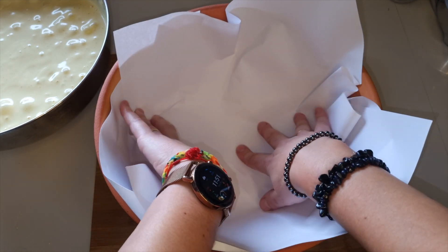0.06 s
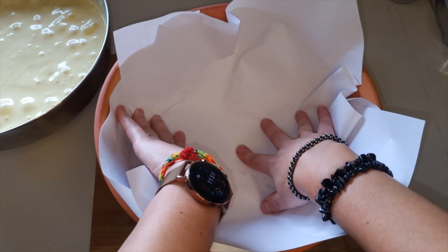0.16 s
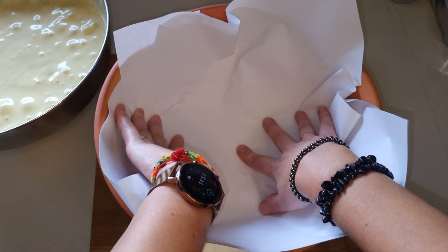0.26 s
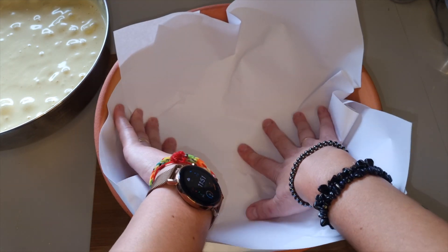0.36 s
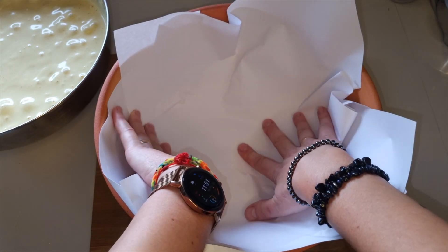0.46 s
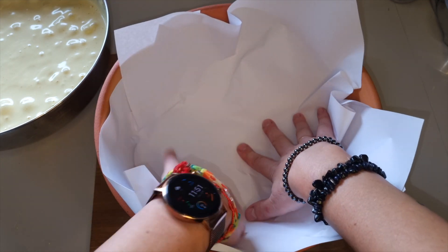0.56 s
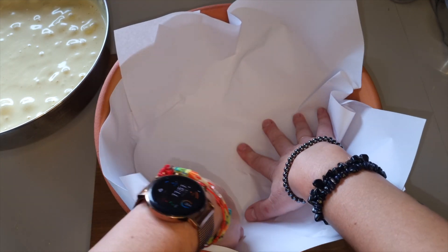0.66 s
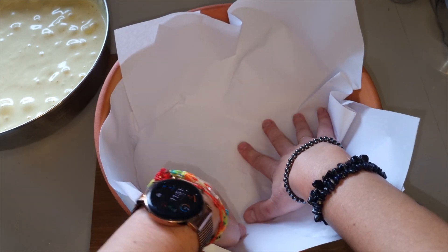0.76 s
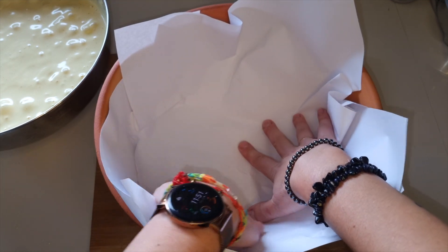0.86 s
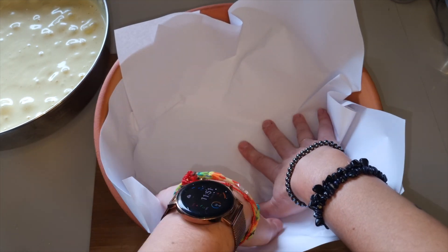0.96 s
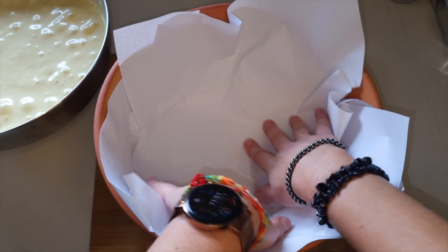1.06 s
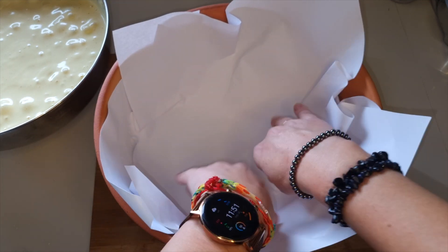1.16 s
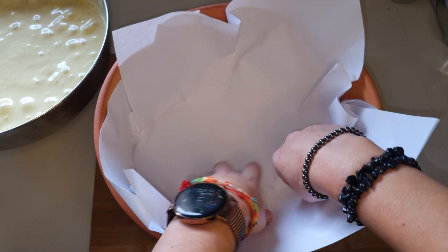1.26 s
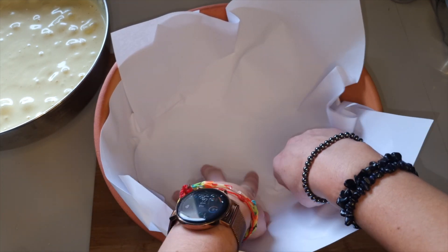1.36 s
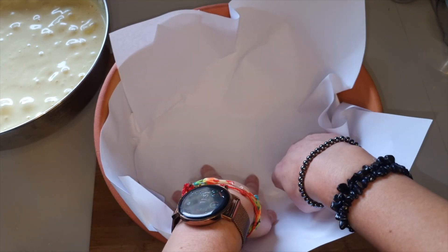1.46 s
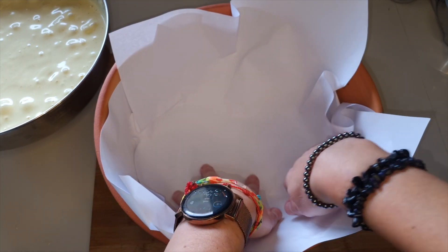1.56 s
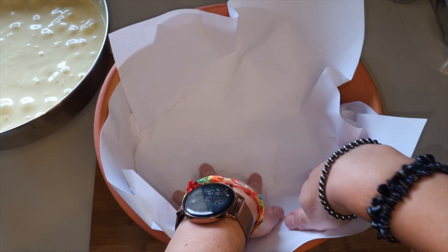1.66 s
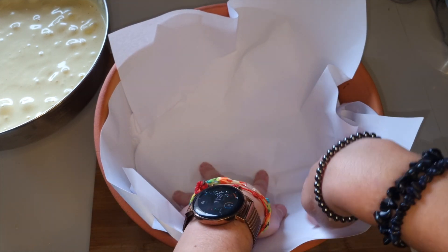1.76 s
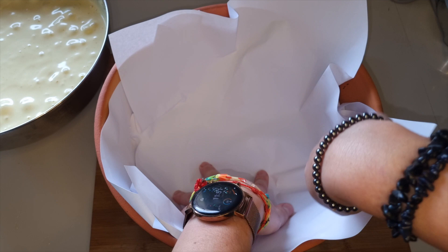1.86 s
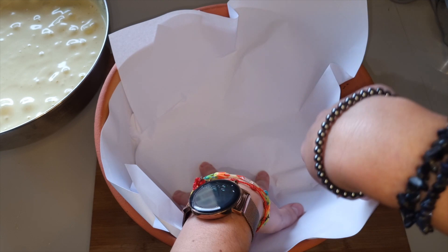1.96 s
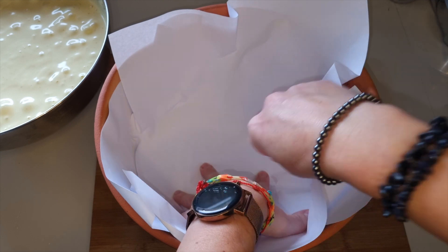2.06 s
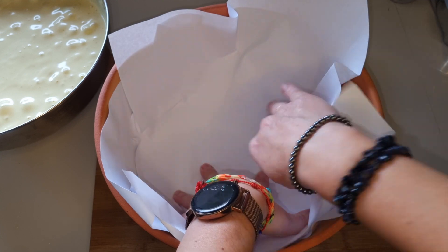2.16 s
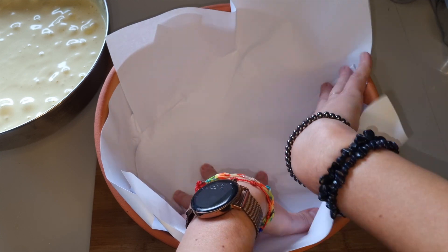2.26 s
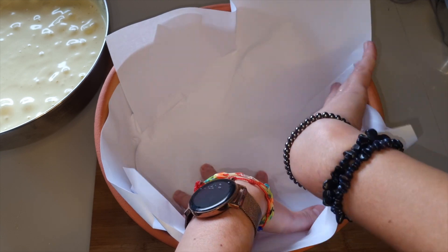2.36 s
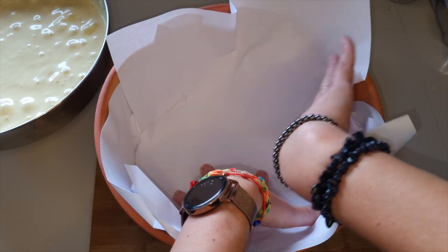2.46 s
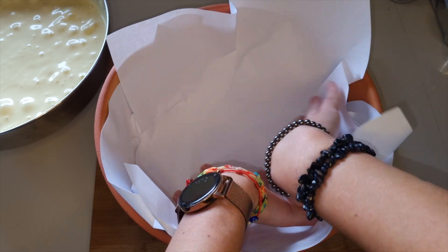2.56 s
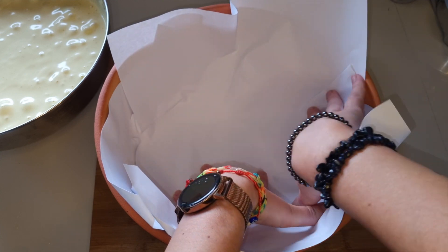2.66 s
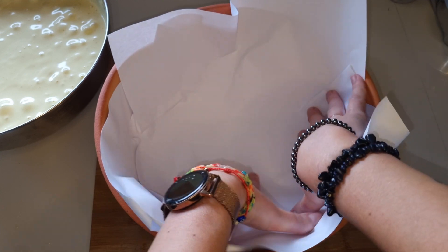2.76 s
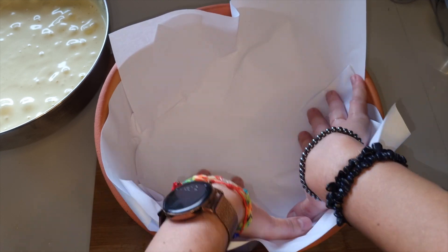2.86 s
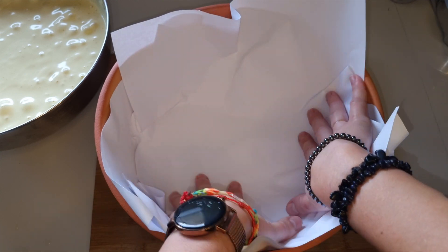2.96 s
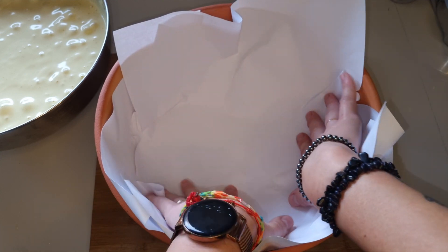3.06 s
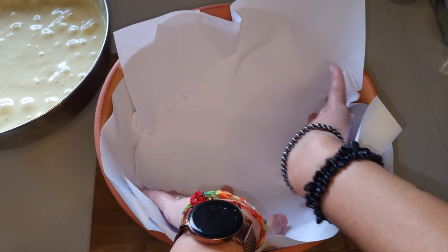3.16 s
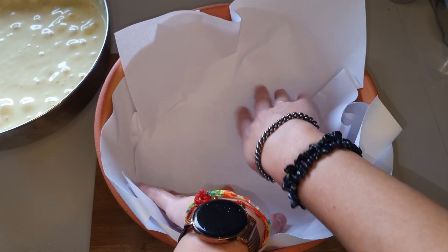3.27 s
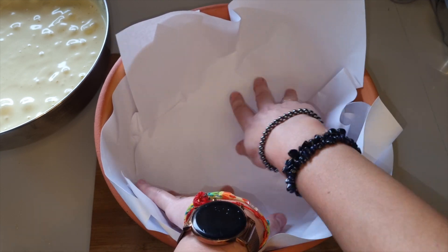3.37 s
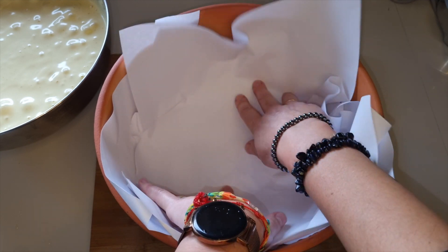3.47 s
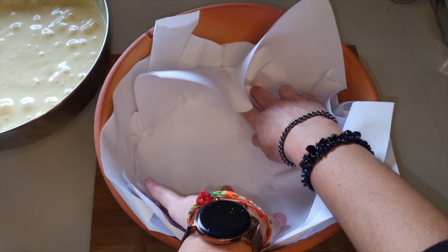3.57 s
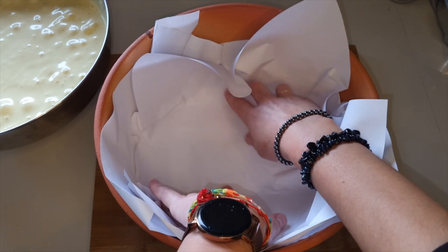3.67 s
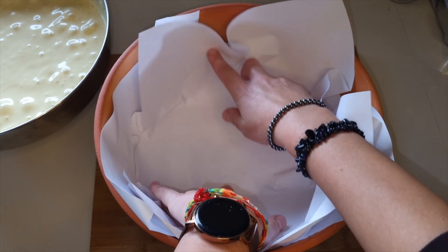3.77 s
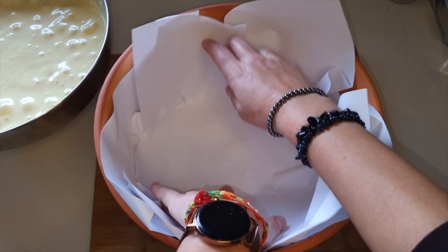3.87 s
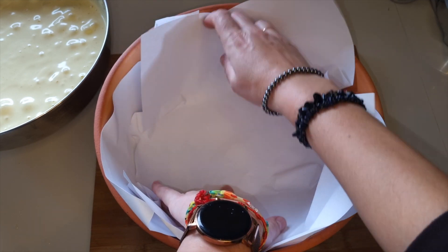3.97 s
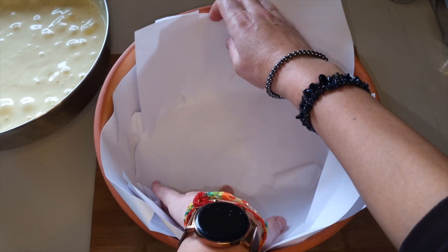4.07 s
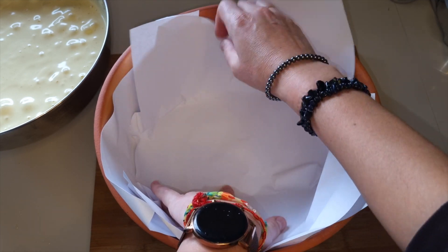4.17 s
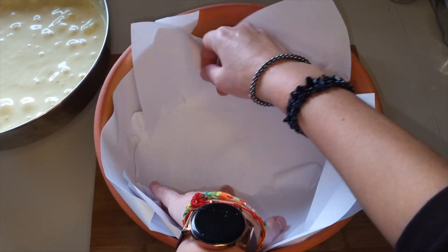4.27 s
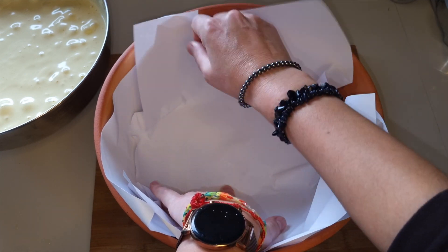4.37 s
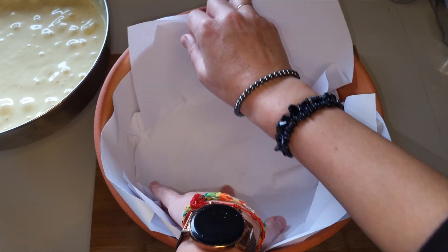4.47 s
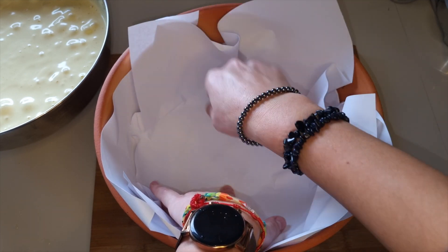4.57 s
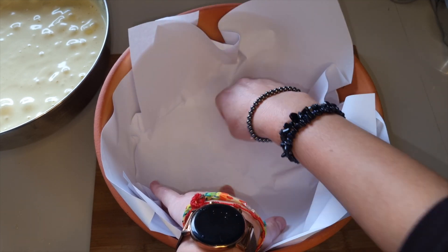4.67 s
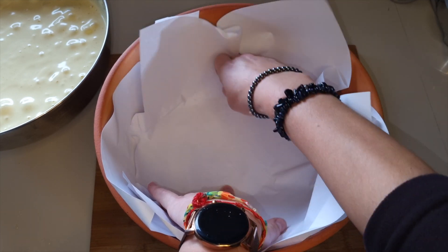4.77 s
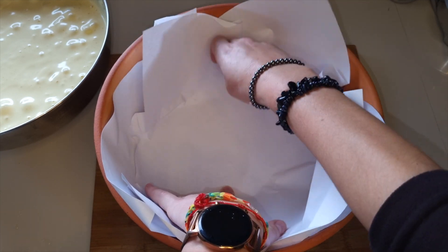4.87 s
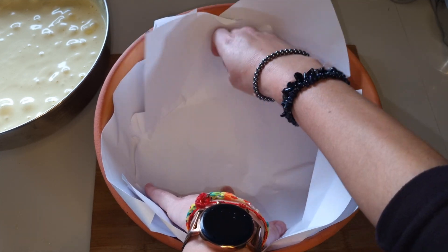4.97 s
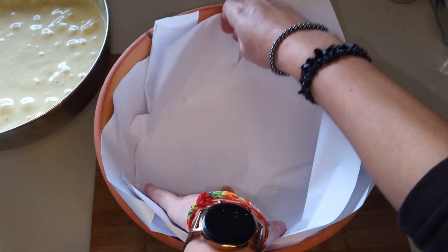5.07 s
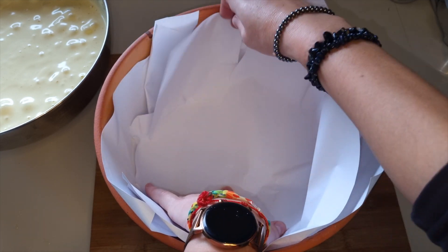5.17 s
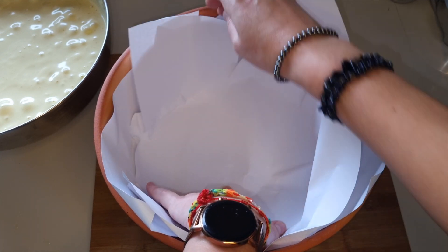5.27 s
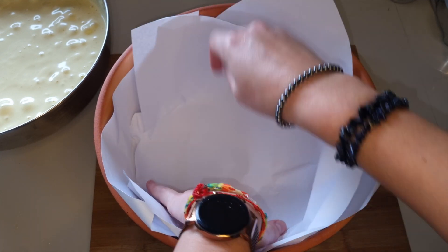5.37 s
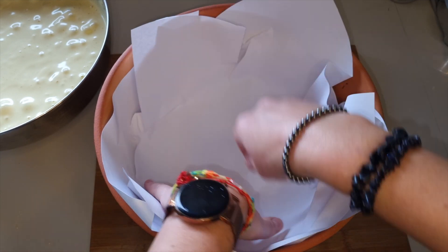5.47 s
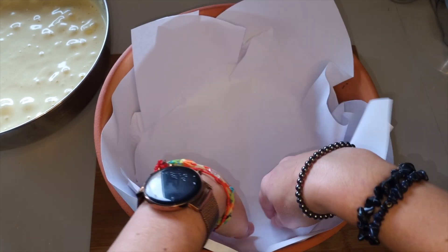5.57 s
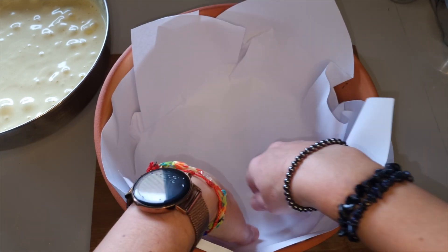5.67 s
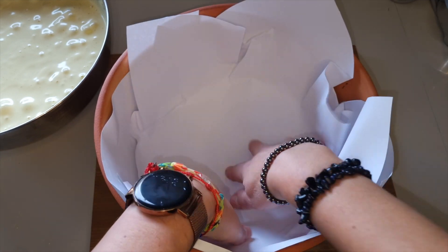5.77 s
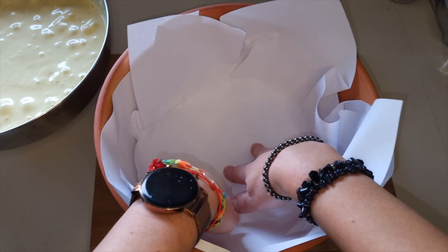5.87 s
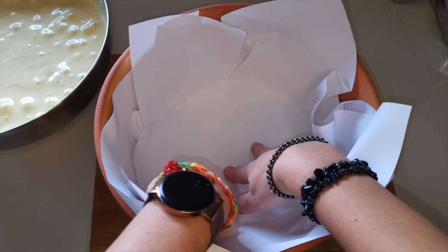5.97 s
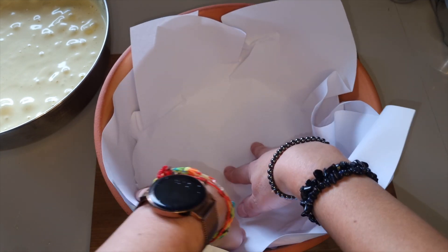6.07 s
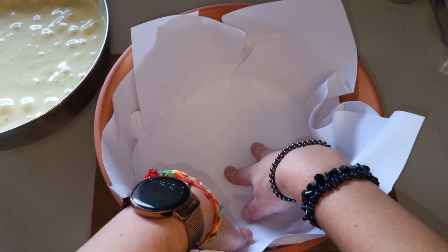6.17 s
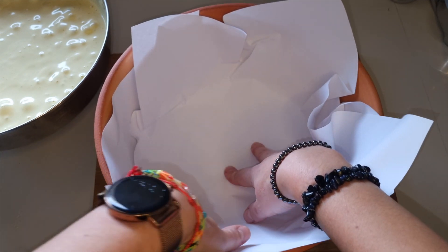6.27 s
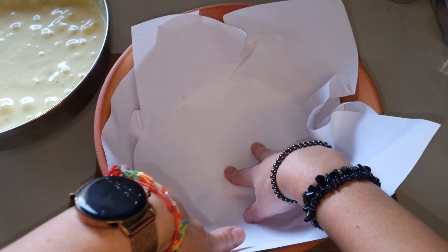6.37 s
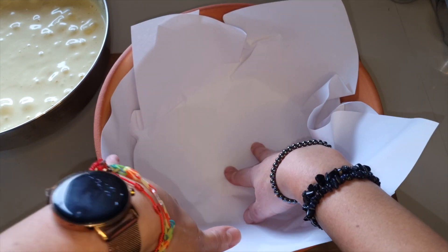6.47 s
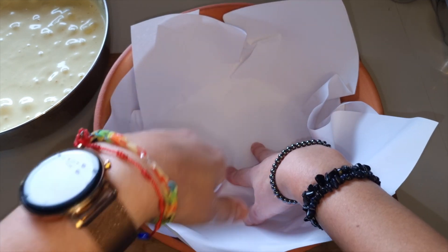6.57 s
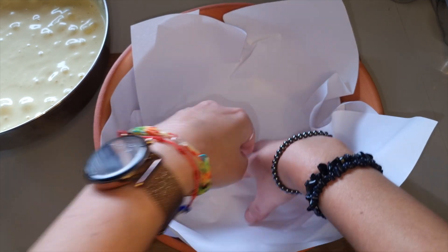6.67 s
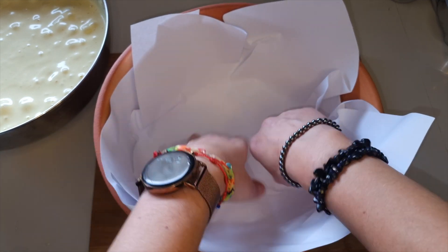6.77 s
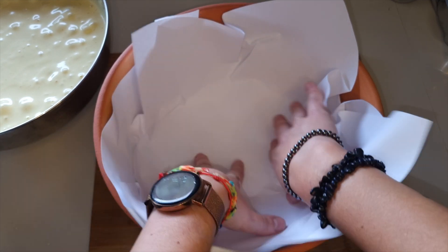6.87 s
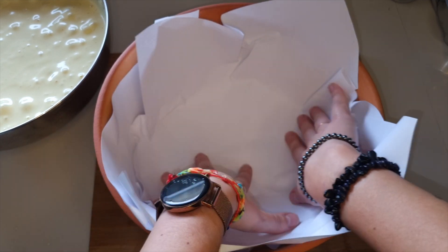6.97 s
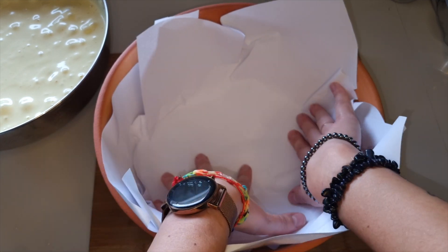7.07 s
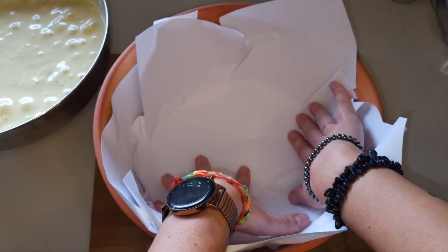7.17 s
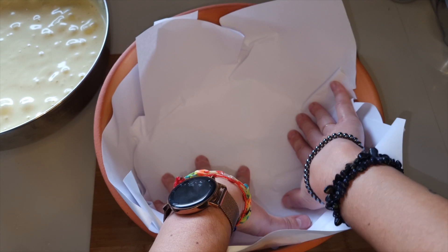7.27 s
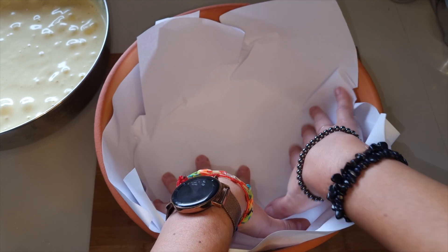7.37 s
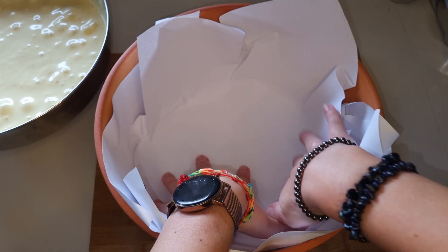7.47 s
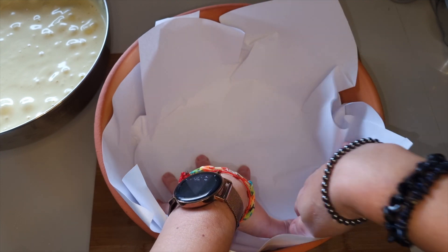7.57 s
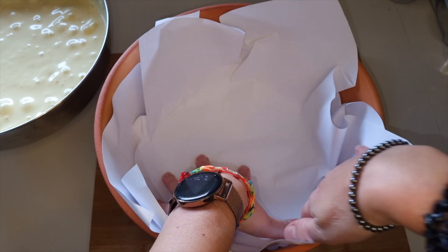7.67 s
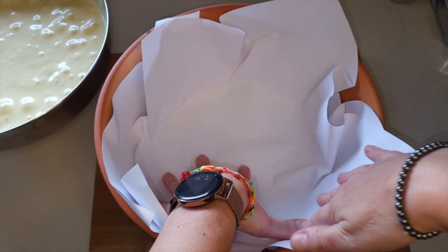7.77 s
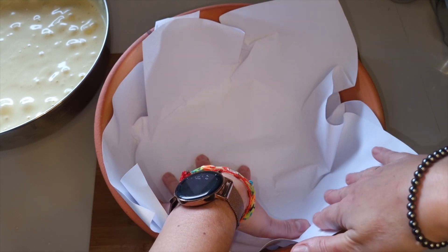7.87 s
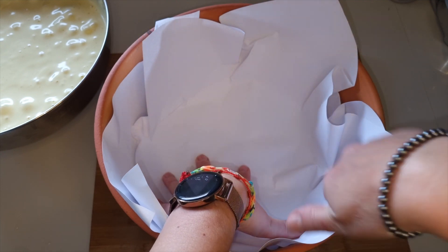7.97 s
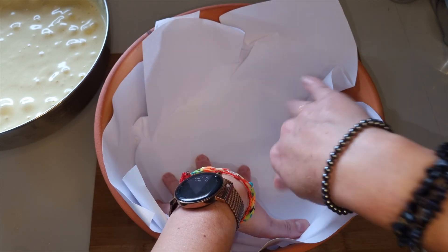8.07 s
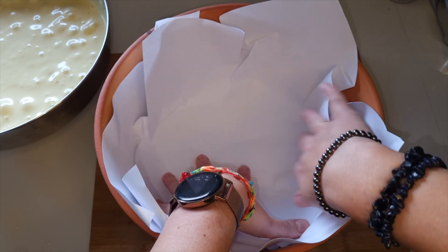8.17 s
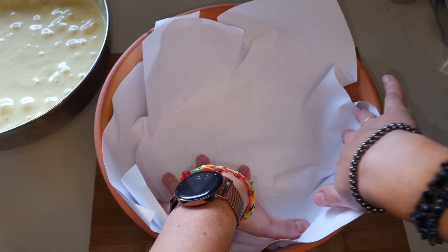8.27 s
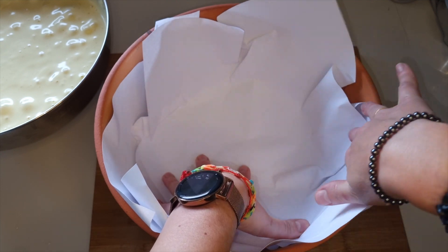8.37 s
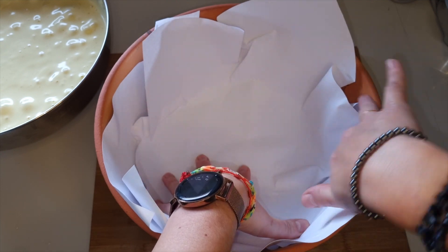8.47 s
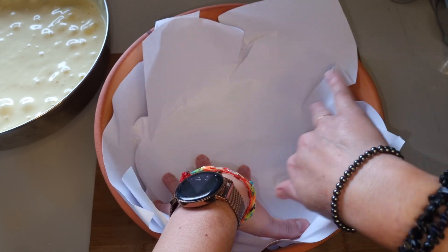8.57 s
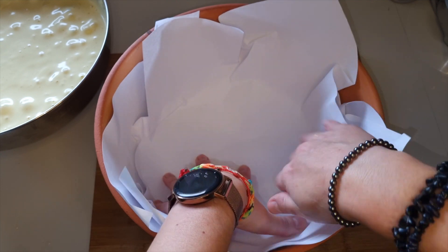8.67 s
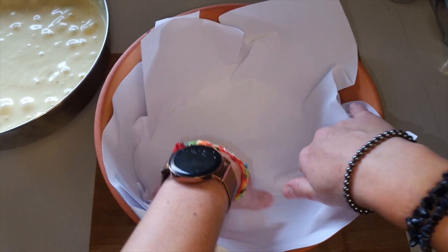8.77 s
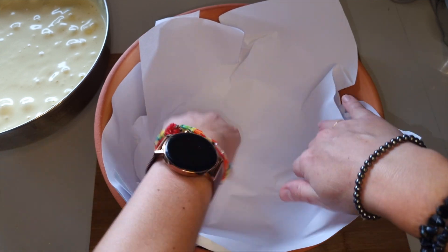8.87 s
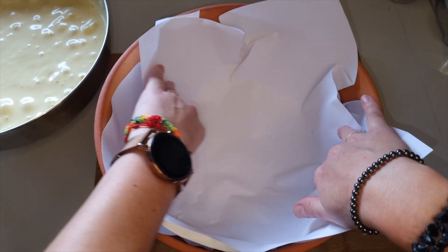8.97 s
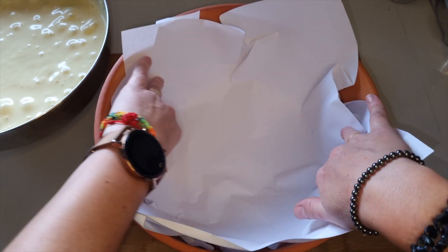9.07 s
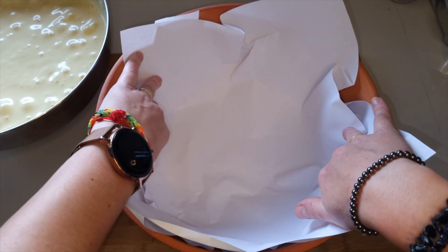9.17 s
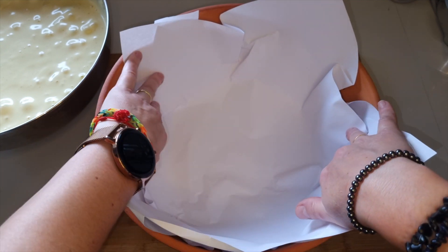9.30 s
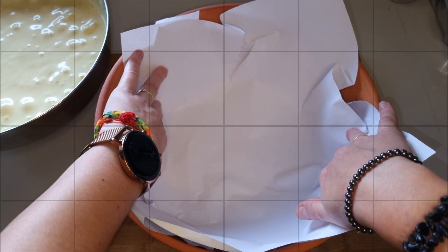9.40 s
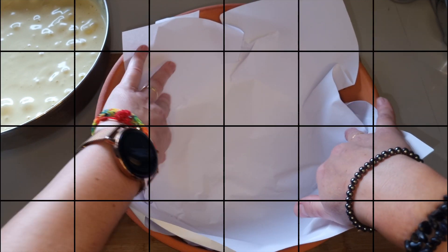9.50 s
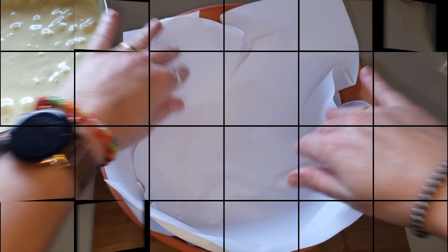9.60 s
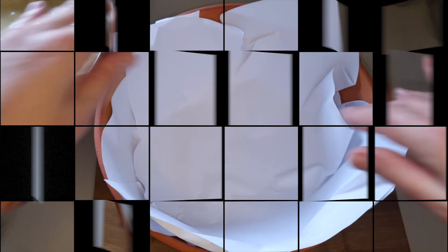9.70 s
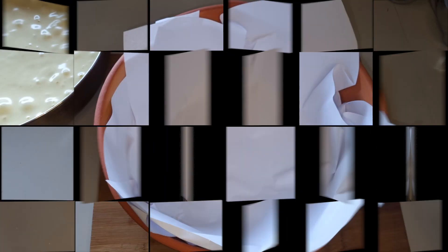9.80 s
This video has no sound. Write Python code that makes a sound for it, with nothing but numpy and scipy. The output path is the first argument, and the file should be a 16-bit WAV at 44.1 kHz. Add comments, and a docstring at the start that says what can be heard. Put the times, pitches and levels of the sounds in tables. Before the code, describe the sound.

Close stereo sound of baking paper being pressed into a round clay pan in a small kitchen. Crackling strokes and papery hiss come in uneven bursts, with sharp crease snaps, the hardest early on, then dense runs of crinkling. Soft palm thuds and a hollow pan murmur lie beneath. The handling becomes sparser near the end, over a very faint low appliance hum.

```python
"""Hands press and fold baking paper into a round clay pan on a counter, close to a stereo microphone, 9.8 s.
From the start: steady low appliance noise, then paper strokes (clumped crackles over sliding hiss) and room echoes.
From 0.07 s creases snap as shaped noise bursts with a panel note; from 0.12 s palms thud as damped pan modes.
The hardest snap falls at 1.4 s, dense runs follow to about 5 s, and snaps thin out after 7.5 s.
Paper and palms also excite the pan's hollow resonances."""
import sys
import numpy as np
from scipy import signal
from scipy.fft import rfft, irfft
from scipy.io import wavfile
from scipy.ndimage import uniform_filter1d

SR = 44100
rng = np.random.default_rng(int(sys.argv[2]) if len(sys.argv) > 2 else 0)


def generate_wav(signal):
    """Clip the signal to [-1, 1] and save it as 16-bit WAV at the path in sys.argv[1]."""
    frames = np.transpose(np.atleast_2d(signal))
    scaled = np.clip(frames, -1, 1) * 32767
    pcm = np.round(scaled).astype(np.int16)
    wavfile.write(sys.argv[1], SR, pcm)


N = 433944


def gain_of(db):
    """Decibels to amplitude."""
    return 10 ** (np.asarray(db) / 20)


def evened(x):
    """Scales to an rms of one."""
    return x / np.sqrt(np.mean(x ** 2) + 1e-20)


def read(points, hz):
    """Interpolates a table along log frequency."""
    f, value = np.transpose(points)
    return np.interp(np.log(hz + 1), np.log(f + 1), value)


# left-right correlation: f/Hz, correlation
LIKENESS = [(100, 0.97), (700, 0.78), (1500, 0.48), (3000, 0.15), (12000, 0.06)]


def pair(a, b):
    """Stereo spectra from two independent sources: channels alike in the bass, loose in the treble."""
    hz = np.fft.rfftfreq(a.shape[-1], 1 / SR)
    same = np.clip(read(LIKENESS, hz), 0, 1)
    mid = rfft(a) * np.sqrt(1 + same)
    side = rfft(b) * np.sqrt(1 - same)
    return hz, np.array([mid + side, mid - side]) / 2 ** .5


# pan resonances, hollow and walls: f/Hz, width/Hz, level/dB
PAN_MODES = [(187.4, 22, 1), (360.3, 54, 0.5), (434.3, 39, 6)]


def hollow(hz):
    """Summed band-pass response of the pan's resonances."""
    return sum(gain_of(db) * 1j * w * hz / (f * f - hz * hz + 1j * w * hz) for f, w, db in PAN_MODES)


# appliance noise spectrum: f/Hz, level/dB
HUM_SPECTRUM = [(30, -27), (55, -20.5), (86, -5.5), (130, -32.5), (172, 0.5), (215, -7.5), (460, -13),
                (640, -24), (3000, -41.5), (16000, -65)]
HUM_RMS_DB = -58.5


def hum():
    """Steady appliance noise of the kitchen, weighted to the low end."""
    hz, z = pair(*rng.standard_normal((2, N)))
    noise = irfft(z * gain_of(read(HUM_SPECTRUM, hz)), N)
    return gain_of(HUM_RMS_DB) * evened(noise)


# hands pushing or dragging paper, levels relative:
# full grip t/s, swell/ms, length/s, rustle level/dB, treble level/dB, pan pressure level/dB
STROKES_TABLE = [(0.0, 25, 0.24, -39.5, -45, -45), (0.146, 340, 0.16, -35.5, -35, -39),
                 (0.426, 270, 0.26, -38, -42, -43), (0.683, 63, 0.13, -40, -43, -43),
                 (0.824, 120, 0.087, -37, -43, -35), (1.067, 260, 0.048, -35.5, -40.5, -43.5),
                 (1.246, 35, 0.18, -27, -35.5, -33), (1.63, 510, 0.1, -39.5, -39, -44.5),
                 (1.796, 110, 0.24, -43.5, -42, -40.5), (1.993, 140, 0.38, -41, -43.5, -46),
                 (2.233, 180, 0.048, -34.5, -37.5, -28.5), (2.33, 21, 0.1, -43, -39.5, -33),
                 (2.59, 113, 0.051, -38, -39, -35), (2.752, 54, 0.095, -31.5, -36, -34.5),
                 (2.898, 19, 0.29, -31, -35.5, -30.5), (3.257, 17, 0.06, -55, -62, -45),
                 (3.378, 63, 0.23, -29, -33, -36), (3.678, 31, 0.086, -35.5, -43.5, -46),
                 (3.84, 91, 0.09, -43, -38.5, -38), (3.91, 42, 0.18, -37.5, -43.5, -45),
                 (4.146, 31, 0.023, -40, -41, -45), (4.329, 240, 0.082, -37, -42.5, -41.5),
                 (4.635, 20, 0.1, -32, -36, -44.5), (4.809, 164, 0.05, -34, -35.5, -47),
                 (4.923, 52, 0.17, -34, -34.5, -50), (5.208, 140, 0.026, -40, -46.5, -44.5),
                 (5.358, 87, 0.026, -42, -48.5, -39.5), (5.556, 340, 0.23, -41.5, -44.5, -42.5),
                 (5.767, 13, 0.34, -42, -51, -40.5), (5.992, 260, 0.21, -38.5, -43.5, -43),
                 (6.251, 150, 0.44, -42, -43.5, -39.5), (6.64, 69, 0.15, -38.5, -42, -45.5),
                 (6.84, 51, 0.13, -32, -39, -35.5), (7.031, 100, 0.046, -37, -47, -41.5),
                 (7.142, 33, 0.022, -46, -53, -40), (7.249, 10, 0.13, -36.5, -39.5, -38),
                 (7.519, 87, 0.22, -44, -44.5, -41), (7.747, 590, 0.26, -43.5, -41, -45.5),
                 (8.163, 11, 0.18, -37, -41, -43.5), (8.49, 190, 0.032, -47.5, -49, -47.5),
                 (8.632, 79, 0.18, -44.5, -49.5, -42), (8.942, 82, 0.32, -40.5, -49.5, -45.5),
                 (9.108, 24, 0.046, -34, -45, -36), (9.308, 58, 0.25, -59.5, -60.5, -60),
                 (9.515, 180, 0.033, -49, -49.5, -55)]
# slackening along a stroke: rustle, treble, pressure [dB/s]
SLACKEN_DB_PER_S = [41, 37.5, 37]
SWELL_DB, RELEASE_DB_PER_S = 27.5, 185  # rise over the swell time; extra fall once let go


def effort():
    """Rustle, treble and pressure in dB: strokes swell, slacken, let go; overlaps add in power."""
    t = np.arange(0, N, 64) / SR
    s, swell_ms, length_s, *levels_db = np.transpose(STROKES_TABLE)[:, :, None]
    since = np.maximum(t - s, 0)
    swell_db = SWELL_DB * np.maximum(s - t, 0) * 1000 / swell_ms
    release_db = RELEASE_DB_PER_S * np.maximum(since - length_s, 0)
    edge_db = swell_db + release_db
    power = [(gain_of(db - edge_db - sag * since) ** 2).sum(0)
             for db, sag in zip(levels_db, SLACKEN_DB_PER_S)]
    return [np.interp(np.arange(N) / SR, t, 10 * np.log10(p + 1e-14)) for p in power]


def crackles(count=16, size=512):
    """Small creases give way in bursts of a few ms, each patch of paper with its own broad colour."""
    fires = rng.random(N) < 850 / SR  # 850 per s on average
    strength = gain_of(3.57 * np.minimum(rng.exponential(1, N), 3.2)) * fires
    patch = rng.integers(0, count, N)
    lean = rng.standard_normal((2, N))
    t, hz = np.arange(size) / SR, np.fft.rfftfreq(size, 1 / SR)
    out = np.zeros((2, N))
    for k, ring_hz in enumerate(np.geomspace(780, 3000, count)):
        colour = 0.26 + 1 / (1 + ((hz - ring_hz) / (0.19 * ring_hz)) ** 2)
        burst = t * np.exp(-t / 0.0019 * np.sqrt(ring_hz / 1200))
        pop = irfft(rfft(rng.standard_normal(size)) * colour) * burst
        out += signal.oaconvolve(strength * (patch == k) * lean, evened(pop)[None])[:, :N]
    return evened(out)


# paper body spectrum, also in snaps: f/Hz, level/dB
PAPER_BODY = [(400, -4.5), (700, -14), (850, 2.5), (1200, -1.5), (2400, -4.5), (3300, -1), (4300, -10),
              (8000, -32.5)]
# paper treble spectrum, also in snaps: f/Hz, level/dB
PAPER_FIZZ = [(2500, -16.5), (5000, 4), (9000, 4), (14000, 0), (16000, -3)]


def rustle():
    """Crackles clump over the smooth hiss of sliding paper and the murmur of the pan."""
    body_db, treble_db, press_db = effort()
    drift = uniform_filter1d(rng.standard_normal((3, N)), 600)
    clumps = evened(uniform_filter1d(drift, 600))
    hz, slide = pair(*rng.standard_normal((2, N)))
    hz, pops = pair(*(crackles() * gain_of(1.66 * clumps[0])))
    body = evened(irfft((0.53 * slide + 0.5 * pops) * gain_of(read(PAPER_BODY, hz)), N))
    fizz = evened(irfft((slide + 0.26 * pops) * gain_of(read(PAPER_FIZZ, hz)), N))
    boom = evened(irfft((slide + 1.7 * pops) * hollow(hz) * hz / (hz + 300), N))
    body = body * gain_of(body_db - 3.0)
    fizz = fizz * gain_of(treble_db - 2.5 + 2.0 * clumps[1])
    boom = boom * gain_of(press_db - 3.0 + 3.14 * clumps[2])
    return body + fizz + boom


# room decay: f/Hz, t60/s
KITCHEN_T60 = [(200, 0.71), (700, 0.24), (1000, 0.17), (2000, 0.32), (6000, 0.34), (14000, 0.27)]


def kitchen(x):
    """Sparse echoes from 5 ms on, each band with its own decay; three echo sets fade in turn for moving hands."""
    taps = np.zeros((6, SR))
    at = np.arange(220, SR - 20, 20) + rng.integers(0, 20, (6, (SR - 221) // 20))
    np.put_along_axis(taps, at, rng.choice([-1., 1.], at.shape), 1)
    taps *= 1 + 2.4 * np.exp(-np.arange(SR) / SR / 0.008)  # nearest surfaces return most
    hz, z = pair(taps[:3], taps[3:])
    hz, t, z = signal.stft(irfft(z, SR), SR, nperseg=256)
    decay = gain_of(-60 * t / read(KITCHEN_T60, hz)[:, None])
    tail = signal.istft(z * decay, SR, nperseg=256)[1]
    tail = tail / np.linalg.norm(tail[0, 0])
    phase = np.arange(N) / SR * 3.3 + np.arange(3)[:, None] / 3
    turns = np.cos(np.pi * phase) * np.sqrt(2 / 3)  # constant total power
    return signal.fftconvolve((x * turns)[None], tail, axes=2).sum(1)[:, :N]


# creases, levels relative: t/s, level/dB, panel ring f/Hz, treble level/dB (re body)
CREASES = [(0.071, -18.5, 1250, -4), (0.119, -20.5, 810, -7.5), (0.151, -18.5, 840, 4.5),
           (0.168, -26, 1640, -13.5), (0.203, -12.5, 3020, 7), (0.439, -28.5, 1180, -25.5),
           (0.466, -27, 990, 1), (0.693, -25, 1020, -8), (0.726, -28, 1760, -23), (0.812, -21.5, 744, 1),
           (0.853, -29.5, 2440, -31), (0.901, -22, 1010, -22), (1.234, -21, 1800, -8),
           (1.266, -19, 790, -17), (1.279, -20, 1730, -10), (1.288, -21, 1220, -6), (1.313, -17, 1500, 4.5),
           (1.329, -21, 1500, -2), (1.385, -6.5, 910, -3.5), (1.472, -19, 1000, -22),
           (1.619, -28, 820, -33), (1.639, -25, 1170, -16.5), (1.672, -13, 656, 0.5),
           (1.717, -29.5, 1160, -34), (1.787, -21.5, 3200, -26), (1.908, -17.5, 1070, -17.5),
           (2.155, -29, 980, -14), (2.219, -22, 900, -1), (2.25, -21.5, 1040, -15), (2.342, -15, 1500, 0.5),
           (2.463, -26.5, 1210, -13), (2.567, -27, 1400, -7), (2.575, -21.5, 1060, 0),
           (2.591, -25.5, 960, -29), (2.63, -25.5, 1070, -38), (2.743, -16, 1620, -9.5),
           (2.812, -25, 2000, -15), (2.878, -22.5, 3270, -7), (2.902, -17, 766, 9.5), (2.947, -23, 2800, 6),
           (2.959, -21, 1070, -23), (2.978, -24.5, 870, -25), (3.088, -31, 1500, -8),
           (3.257, -44.5, 3270, 16), (3.277, -22, 880, -23), (3.344, -20, 860, -40),
           (3.368, -25, 1190, -26), (3.38, -17, 1080, -28), (3.386, -14.5, 1110, -2.5),
           (3.396, -30, 980, -23.5), (3.47, -11, 846, -7), (3.517, -17.5, 3380, 0.5),
           (3.696, -16.5, 950, -17), (3.754, -14.5, 1300, -2), (3.781, -16, 2980, 4), (3.821, -8, 1460, -2),
           (3.851, -17, 2620, 2), (3.936, -13.5, 1900, -8), (3.948, -18, 930, -10), (3.958, -17.5, 950, -5),
           (4.043, -32.5, 1260, -12), (4.143, -31.5, 1280, -17), (4.284, -29.5, 3220, 4.5),
           (4.35, -21.5, 2350, -7), (4.375, -28, 2760, 2), (4.618, -30, 955, -9), (4.636, -13, 1020, -1.5),
           (4.649, -19.5, 1270, -9), (4.692, -18.5, 1990, -6.5), (4.738, -28, 1190, -4),
           (4.763, -18, 1110, -31), (4.819, -19.5, 3180, -2), (4.841, -21.5, 1530, -2),
           (4.929, -25.5, 1370, -13), (4.977, -37, 1230, -13), (5.018, -22, 1270, -32),
           (5.091, -26.5, 2950, 3), (5.207, -27.5, 1220, 3), (5.337, -28, 1000, -60),
           (5.39, -25, 1010, -25), (5.552, -22, 1010, -12), (5.762, -15.5, 1830, -4),
           (5.779, -12.5, 990, -0.5), (6, -19.5, 1210, -17), (6.038, -20.5, 1600, -20),
           (6.246, -28, 940, -35), (6.339, -22, 790, -10), (6.412, -26, 850, -7), (6.636, -28.5, 970, -10),
           (6.777, -35, 850, -33), (6.791, -32.5, 2480, 6), (6.84, -16.5, 900, -12), (6.86, -20, 870, -8),
           (6.936, -24.5, 990, -22), (7.061, -16.5, 780, 2), (7.164, -31, 3340, 1),
           (7.212, -20.5, 835, -14.5), (7.251, -12, 1084, -3), (7.472, -24, 1500, -23),
           (7.746, -23, 790, -10.5), (8.051, -30, 1800, -9), (8.171, -13, 1070, -5),
           (8.267, -30.5, 1320, -15), (8.337, -27, 775, -13), (8.731, -30.5, 840, -9),
           (8.934, -21.5, 960, -22), (9.114, -21, 1170, -3.5), (9.511, -25.5, 2120, -14)]
# burst length at -15.5 dB; strong creases let go faster; random spread in log length
SNAP_MS, SHORTER_MS_PER_DB, SNAP_LOG_SPREAD = 3.68, 0.25, 0.16


def snaps(size=2048):
    """Each crease lets go in a burst of a few ms: paper body, fizz and panel note, with a slower pan boom."""
    s, db, ring_hz, treble_db = np.transpose(CREASES)[:, :, None]
    a, b = rng.standard_normal((2, len(s), size))
    chance = rng.standard_normal((len(s), 7))
    hz, z = pair(a, b)
    ms = (SNAP_MS - SHORTER_MS_PER_DB * (db + 15.5)) * np.exp(SNAP_LOG_SPREAD * chance[:, 2:3])
    t = np.arange(size) / SR / np.clip(ms / 1000, 1e-3, 1e-2)  # in burst lengths

    def burst(rise, fall):
        return (1 - np.exp(-t / rise)) ** 2 * np.exp(-t / fall)

    def unit(x):
        return x / abs(x.mean(0)).max(-1, keepdims=True)

    # large, low panels ring most
    ring = 1 + (1900 / ring_hz) ** 2 / (1 + ((hz - ring_hz) / (.19 * ring_hz)) ** 2)
    # four neighbouring folds ring along, each crease its own
    folds_hz = 1200 * np.exp(0.67 * abs(chance[:, 3:7, None]))
    ring = ring * (1 + (0.74 / (1 + ((hz - folds_hz) / (0.09 * folds_hz)) ** 2)).sum(1))
    # dull creases are dull in the body too, and lose the top of their fizz
    ring = ring * (1 + hz / 1500) ** (0.064 * (treble_db + 17.5))
    slope = (1 + hz / 6000) ** (0.13 * (treble_db - 5.0))
    body = unit(irfft(z * gain_of(read(PAPER_BODY, hz)) * ring) * burst(0.13, 0.7))
    fizz = unit(irfft(z * gain_of(read(PAPER_FIZZ, hz)) * slope) * burst(0.16, 0.91))
    boom = unit(irfft(z * hollow(hz) * hz ** 2 / (hz + 400)) * burst(0.94, 5.6))
    cycles = ring_hz * np.arange(size) / SR
    note = 0.5 * np.sin(2 * np.pi * cycles) * cycles * np.exp(-cycles / 1.3)  # lasts a few cycles
    fizz_gain = gain_of(treble_db - 4.0)
    boom_gain = gain_of(-28.0 + 9.9 * chance[:, :1])
    sound = gain_of(db + 2.5) * (body + note + fizz_gain * fizz + boom_gain * boom)
    side_db = 0.28 * chance[:, 1]  # creases lie all round the rim
    out = np.zeros((2, N + size))
    for k, start in enumerate(np.round(s[:, 0] * SR).astype(int)):
        out[:, start:start + size] += sound[:, k] * gain_of(side_db[k] * np.array([[1], [-1]]))
    highpass = signal.butter(2, 220., "high", fs=SR, output="sos")  # paper moves no deep bass
    return signal.sosfilt(highpass, out[:, :N])


# palms and knuckles on the pan, levels relative: t/s, level/dB, decay/ms, strongest near f/Hz
PALMS = [(0.124, -28.5, 20, 148), (2.21, -22, 24, 200), (2.335, -23, 17, 200), (3.438, -20.5, 34, 135),
         (4.142, -30, 15, 300), (4.769, -27, 22, 320), (4.925, -28.5, 33, 320), (5.091, -29, 18, 320),
         (5.789, -42, 36, 49.7), (7.147, -25.5, 38, 166), (7.347, -22, 37, 200), (7.526, -28.5, 35, 430),
         (8.336, -29, 23, 250), (9.116, -27, 25, 380)]
# modes of pan on counter: f/Hz, level/dB, ring/thud decays
COUNTER_MODES = [(52, -0.5, 1.5), (93.4, 3, 1.4), (166.6, 4, 0.92), (204, 5.5, 0.52), (320, 5, 0.58),
                 (440, -2.5, 1.1)]


def thuds(size=8192):
    """A palm lands: pan and counter modes knock, each with its own decay, under the palm's rough roll."""
    t, hz = np.arange(size) / SR, np.fft.rfftfreq(size, 1 / SR)
    out = np.zeros(N + size)
    settling = t + 0.0062 * (1 - np.exp(-t / 0.015))  # pitch sinks as the palm settles
    for s, db, ms, near_hz in PALMS:
        knock = np.zeros(size)
        for f, level_db, ring in COUNTER_MODES:
            nearness = 1 / (1 + (np.log(f / near_hz) / 0.59) ** 2)
            mode = np.sin(2 * np.pi * f * settling) * np.exp(-1000 * t / (ms * ring))
            knock += gain_of(level_db) * nearness * mode
        rough = rfft(rng.standard_normal(size))
        roll = irfft(rough * hollow(hz) / (1 + 1j * hz / near_hz) ** 2) * np.exp(-1000 * t / ms)
        sound = knock / abs(knock).max() + 0.3 * roll / abs(roll).max()
        sound = sound * (1 - np.exp(-t / 0.0015))
        out[round(s * SR):][:size] += gain_of(db - 0.5) * sound
    return out[:N]


def scene():
    """Hum, paper and pan, and their echoes."""
    noise, hands, creases, palms = hum(), rustle(), snaps(), thuds()
    send = gain_of(-11.5) * hands.mean(0) + gain_of(-4.5) * creases.mean(0) + gain_of(-9.5) * palms
    return noise + hands + kitchen(send) + creases + palms


EDGE_HZ = 16000


def record(dry):
    """Microphone drops the deep bass, its right port slightly more sensitive; then the band limit."""
    highpass = signal.butter(3, 50., "high", fs=SR, output="sos")
    ports = signal.sosfilt(highpass, dry) * gain_of([[-.4], [.4]])
    lowpass = signal.firwin(511, EDGE_HZ, window=("kaiser", 9), fs=SR)
    return signal.oaconvolve(ports, lowpass[None], "same")


dry = scene()
out = record(dry)
generate_wav(out)
```